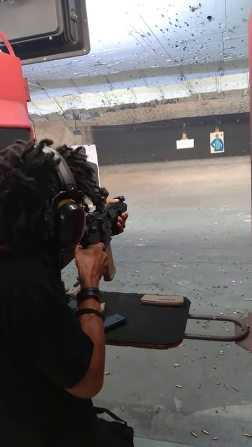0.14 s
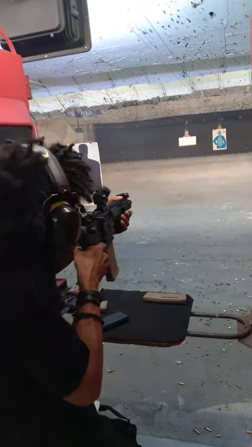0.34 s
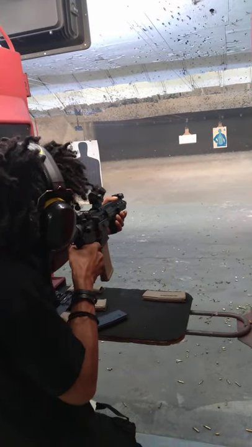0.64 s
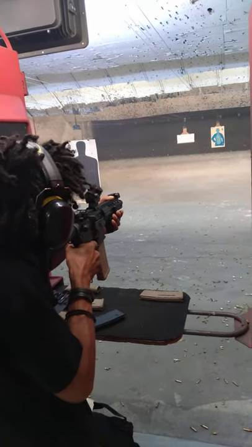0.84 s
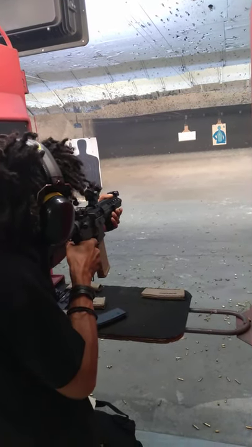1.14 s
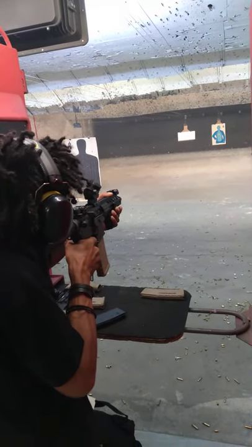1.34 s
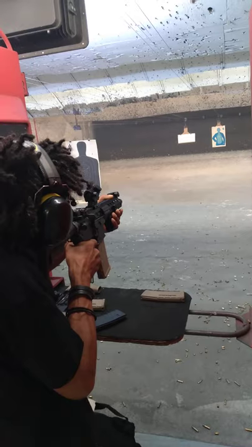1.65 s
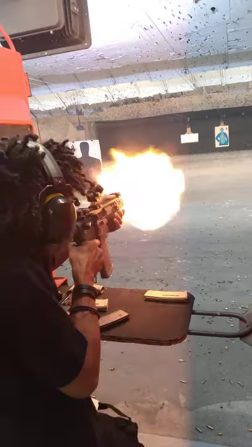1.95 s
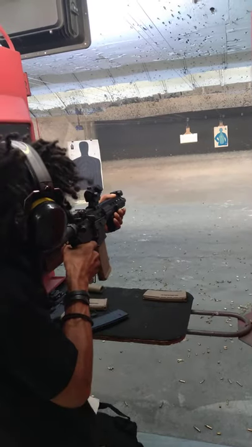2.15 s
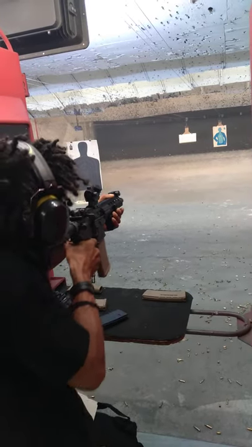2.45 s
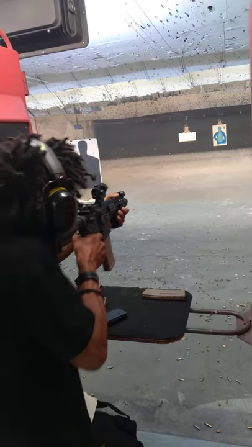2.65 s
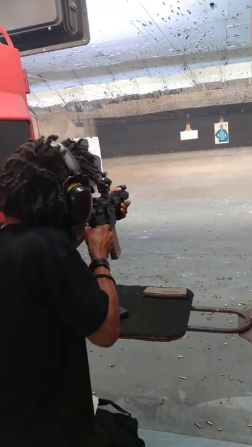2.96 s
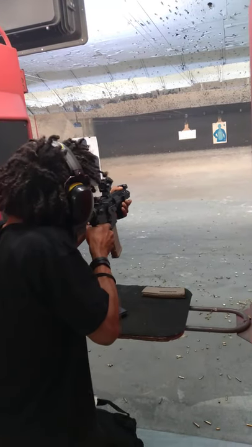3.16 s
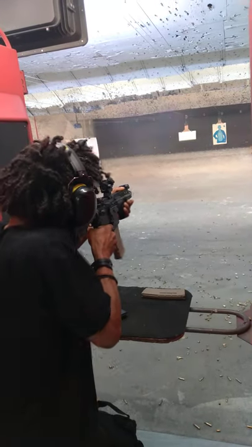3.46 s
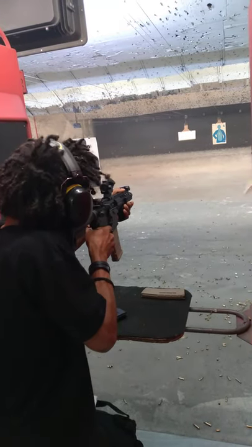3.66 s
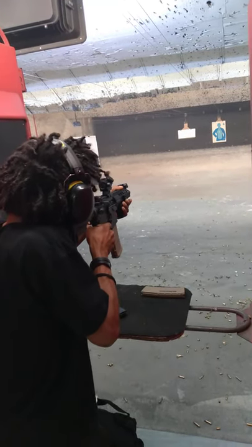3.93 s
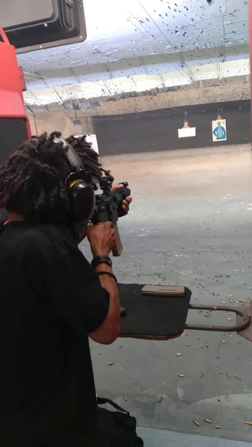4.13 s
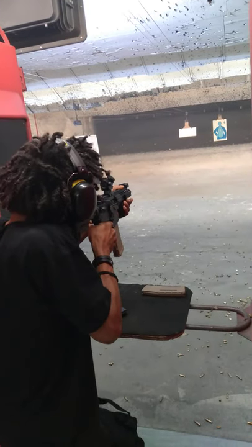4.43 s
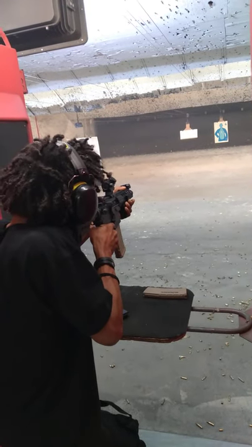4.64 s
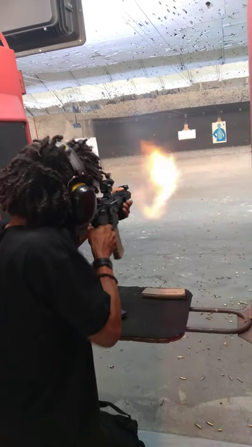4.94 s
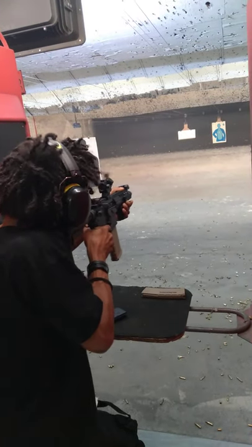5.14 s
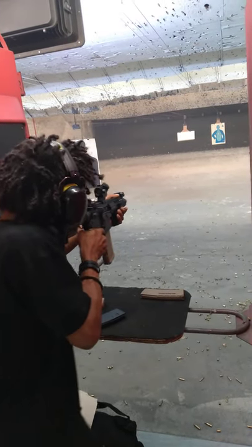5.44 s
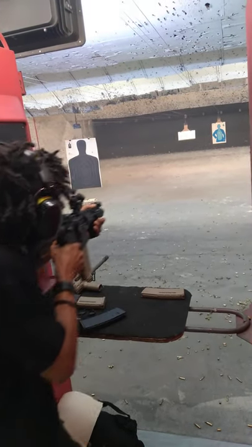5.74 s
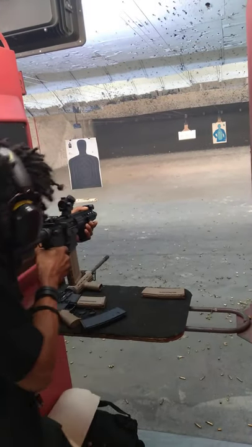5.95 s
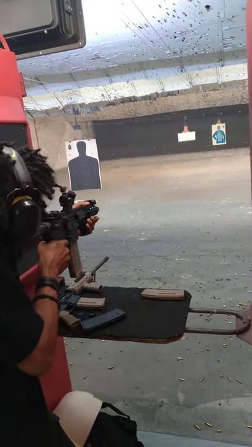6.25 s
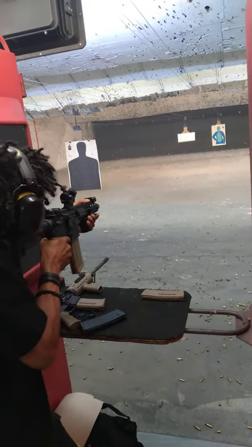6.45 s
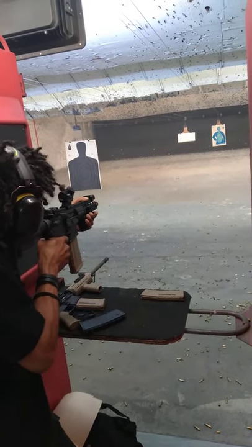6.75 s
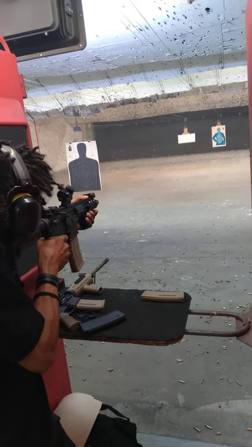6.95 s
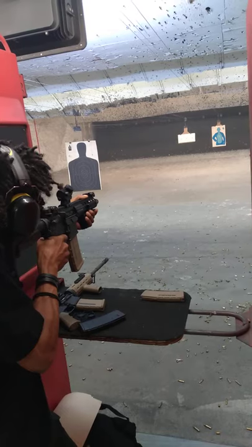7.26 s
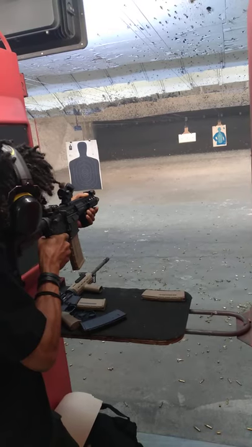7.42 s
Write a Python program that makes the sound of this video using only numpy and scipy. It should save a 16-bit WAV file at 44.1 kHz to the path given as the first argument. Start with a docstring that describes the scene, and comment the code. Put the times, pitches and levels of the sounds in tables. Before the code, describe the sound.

The sound opens on the fading roar of a gunshot in a concrete indoor range. A close rifle fires at about 0.3 seconds. A gun in another lane fires at 1.6, followed quickly by a very loud rifle shot at 2.0 and another at 3.5. The other gun answers at 4.3, the rifle fires again at 5.0, and the other gun fires last at 6.3. Each blast is a sharp crack that overloads the microphone for about half a second, its treble dying first and leaving a booming roar. A tiny hammer snap runs into the start of each rifle shot. Spent brass casings land with high, ringing clinks and short bounces, around 1.0, 2.8, 4.2 and 5.7 seconds. The final echo dies away by about 7.5 seconds, leaving a faint, steady ventilation rumble.

```python
"""A short-barrelled rifle fires in a concrete indoor range, alternating with a gun in another lane.
Each blast fills the hall with decaying noise and overloads the microphone for over half a second;
the treble dies first, leaving a roar. The rifle's hammer snaps just before each shot, and its spent
brass lands, rings and bounces on the floor. The ventilation rumbles underneath."""
import sys
import numpy as np
from scipy import signal
from scipy.io import wavfile
from scipy.ndimage import uniform_filter1d

SR = 44100
rng = np.random.default_rng(int(sys.argv[2]) if len(sys.argv) > 2 else 0)


def master_out(mix):
    """Clip the mix to full scale and print it as 16-bit PCM to the path in sys.argv[1]."""
    frames = np.transpose(np.atleast_2d(mix))
    ceiling = np.clip(frames, -1, 1)
    pcm = np.round(ceiling * 32767).astype(np.int16)
    wavfile.write(sys.argv[1], SR, pcm)


N = 334719
TIME_S = np.arange(N) / SR

# Shots of each gun. Each row: start in seconds, level in dB, then boom, bass, middle and treble in dB.
RIFLE_SHOTS = [(-0.55, 12, 4, 0.5, 2, -13), (0.273, 0.5, -3, -6, -9, 3), (2.046, 9.5, 3.5, -4, 1, -2),
               (3.5082, 9.5, 1, -1.5, 0, -1), (5.0017, 0, 3, -5, -4, 0)]
NEIGHBOUR_SHOTS = [(1.6495, -7.5, 9.5, 1, 1, 0), (4.2635, 3.5, -1, -3.5, -0.5, -4),
                   (6.278, -2, 5.5, -9, 0, -1)]
# Source spectra in the hall. Each row: frequency in Hz, third-octave level in dB.
RIFLE_SPECTRUM = [(35, -5), (65, 10.5), (130, 11.5), (250, 16), (520, 23), (750, 21), (1150, 23),
                  (1600, 20), (2500, 23), (4000, 26.5), (6500, 29), (9500, 33.5), (12000, 29),
                  (15000, 20.5)]
NEIGHBOUR_SPECTRUM = [(35, -19.5), (100, -23.5), (220, -12.5), (380, 12.5), (750, 22), (1200, 26),
                      (1750, 16), (2300, 22), (4300, 23.5), (6500, 28.5), (9500, 32), (12000, 20.5),
                      (15000, 7)]
VENT_SPECTRUM = [(35, -59), (70, -53.5), (130, -51), (220, -58.5), (400, -56), (1000, -53), (2500, -66),
                 (5000, -69.5), (9000, -62), (15000, -80)]
# Hall decay. Each row: frequency in Hz, T60 in seconds.
HALL_T60 = [(60, 0.93), (170, 0.97), (350, 0.95), (700, 0.88), (1400, 0.84), (2700, 0.76), (5400, 0.69),
            (9000, 0.59), (15000, 0.45)]
# Late echo from down the range. Each row: frequency in Hz, gain in dB.
FAR_ECHO = [(100, -22), (190, -19.5), (400, -24), (900, -29.5), (1800, -30), (4300, -35), (6400, -31),
            (9000, -35.5), (13000, -39.5)]
# Diffuse field. Each row: frequency in Hz, left-right correlation.
CORRELATION = [(50, 0.97), (130, 0.99), (290, 0.92), (640, 0.47), (1200, -0.17), (2500, -0.018),
               (8000, 0.106)]
# Booth standing waves and microphone port colour. Each row: frequency in Hz, width in Hz, gain in dB.
BOOTH_PEAKS = [(229.6, 32, 4), (333, 14, 5), (402.5, 36, 4.5), (835, 70, 4), (1090, 110, 0.5),
               (2040, 220, 2.5), (4650, 1000, -1.5), (5380, 590, 0.5), (6770, 550, 1.5)]
# Colour after the overload. Each row: frequency in Hz, width in Hz, gain in dB.
MIC_PEAKS = [(1000, 1220, 2.5), (4940, 4900, -2.5), (9720, 2700, 2), (13400, 6600, -3)]
# Microphone port mismatch. Each row: frequency in Hz, width in Hz, left minus right in dB.
PORT_PEAKS = [(80, 200, -4), (680, 310, -3), (1540, 650, 3), (2700, 900, -2), (6440, 1500, 4)]
# A case's knock and two bending rings. Each row: frequency in Hz, width in Hz.
KNOCK_MODES = [(6900, 520), (9400, 3300)]
LOW_RING_MODES = [(11400, 110)]
HIGH_RING_MODES = [(15090, 80), (15430, 120)]
# Ejected cases. Each row: landing in seconds, then in dB clack, ring, high over low ring, leftward pan,
# rebound clack, rebound ring, loss per bounce.
CASE_LANDINGS = [(0.084, -19, -34.5, -3, 4.5, -42.5, -40.5, 11.5), (0.977, -15.5, -18.5, 3, 0, -53, -40, 0),
                 (1.462, -45.5, -54, -2, 11, -58, -67, 4.5), (2.822, -28.5, -44, 4, 2, -28.5, -32.5, 11.5),
                 (4.22, -14.5, -14, -13, -1.5, -44, -17, 10.5), (5.7318, -25.5, -30, 2, 5, -48, -45, 2)]
# Hops of those cases. Each row: first hop in seconds, share of hop time kept per bounce.
CASE_HOPS = [(.33, .5), (.3, .56), (.089, .57), (.369, .5), (.42, .5), (.328, .48)]


def from_db(db):
    """Decibels to gain."""
    return 10 ** (np.asarray(db) / 20)


def unit_rms(x):
    """Scale to unit power."""
    return x / np.sqrt(np.mean(x ** 2) + 1e-20)


def at_hz(table, hz):
    """Read a table on a log-frequency axis."""
    freqs_hz, values = np.transpose(table)
    return np.interp(np.log(hz), np.log(freqs_hz), values)


def band(x, low_hz, high_hz, order=2):
    """Band-pass at unit power."""
    sos = signal.butter(order, [low_hz, min(high_hz, SR / 2 - 500)], "band", fs=SR, output="sos")
    return unit_rms(signal.sosfilt(sos, x))


def peaks(x, table):
    """Resonant boosts and cuts in series."""
    for hz, width_hz, db in table:
        x = x + (from_db(db) - 1) * signal.lfilter(*signal.iirpeak(hz, hz / width_hz, fs=SR), x)
    return x


def bell(hz, centre_hz, width_hz):
    """Resonance curve of height 1."""
    return 1 / (1 + ((hz - centre_hz) / width_hz) ** 2)


def low_shelf(hz, corner_hz, power=2):
    """Weight falling from 1 to 0 around the corner."""
    return 1 / (1 + (hz / corner_hz) ** power)


def decay(age_s, t60_s):
    """Exponential decay with a 0.5 ms attack."""
    return np.clip(age_s * 2000, 0, 1) * from_db(-60 * np.maximum(age_s, 0) / t60_s)


def ventilation_power(hz):
    """Steady ventilation rumble in one band."""
    return from_db(at_hz(VENT_SPECTRUM, hz)) ** 2


def bounces(count=3, settling_db=10.0, first_knock_db=10, rebound_knock_db=0, brighter_db=5):
    """A case lands hard, then rebounds brighter in ever shorter hops, fading faster as it settles."""
    for case, (hop_s, kept) in zip(CASE_LANDINGS, CASE_HOPS):
        start_s, clack_db, ring_db, high_db, pan_db, rebound_clack_db, rebound_ring_db, loss_db = case
        yield start_s, clack_db, first_knock_db, ring_db, high_db, pan_db
        for k in range(count):
            start_s += hop_s * kept ** k
            lost_db = k * loss_db + k * (k - 1) * settling_db
            yield (start_s, rebound_clack_db - lost_db, rebound_knock_db,
                   rebound_ring_db - lost_db, high_db + brighter_db, pan_db)


def brass(knock_t60_s=0.013, room_t60_s=0.25, ring_t60_s=0.21, spin_db=-14, spin_t60_s=0.36):
    """Each contact knocks with a short echo; the case rings, and rings on faintly as it spins."""
    white = rng.standard_normal((2, N))
    room = band(white, 5300, 12500, order=4)
    knock, low, high = (
        unit_rms(sum(band(white, hz - width_hz / 2, hz + width_hz / 2) for hz, width_hz in modes))
        for modes in (KNOCK_MODES, LOW_RING_MODES, HIGH_RING_MODES))
    out = np.zeros((2, N))
    for start_s, clack_db, knock_db, ring_db, high_db, pan_db in bounces():
        span = slice(int(start_s * SR), int(start_s * SR) + SR // 2)
        age_s = TIME_S[span] - start_s
        impact = from_db(knock_db) * knock[:, span] * decay(age_s, knock_t60_s)
        clack = from_db(clack_db) * (impact + room[:, span] * decay(age_s, room_t60_s))
        bending = low[:, span] + from_db(high_db) * high[:, span]
        ring = from_db(ring_db) * bending * decay(age_s, ring_t60_s)
        spin = from_db(ring_db + spin_db) * low[:, span] * decay(age_s, spin_t60_s)
        out[:, span] += (clack + ring + spin) * from_db([[pan_db / 2], [-pan_db / 2]])
    return out


def hammer(level_db=-17, lead_s=0.0082, t60_s=0.08):
    """The hammer snaps on the firing pin just before each rifle shot."""
    snap = band(rng.standard_normal((2, N)), 5500, 12000)
    return from_db(level_db) * snap * sum(decay(TIME_S - shot[0] + lead_s, t60_s) for shot in RIFLE_SHOTS)


def clumps(time_s):
    """Reflections arrive in clumps of about 25 ms; unit RMS."""
    return unit_rms(uniform_filter1d(rng.standard_normal(len(time_s)), size=55))


def surges_db(time_s, lift_db=3.5, width_s=0.005, count=30):
    """Wall reflections coincide now and then, briefly lifting the roar."""
    offsets, sizes = rng.random((count, 2)).T
    centres_s = (np.arange(count) + offsets) * time_s[-1] / count
    return sum(lift_db * (0.5 + size) * np.exp(-((time_s - centre_s) / width_s) ** 2)
               for centre_s, size in zip(centres_s, sizes))


def blast_power(shots, spectrum, hz, time_s, far_db, far_stretch=1.794,
                build_s=0.087, early_share=0.19, crack_db=6.5, crack_t60_s=0.3):
    """One gun in one band: bright muzzle crack, hall decay and a faint, longer echo from down range."""
    boom, bass = low_shelf(hz, 130, power=4), low_shelf(hz, 400)
    middle, treble = bell(hz, 1360, 295), 1 - low_shelf(hz, 3500)
    delayed_share = (1 - early_share) * low_shelf(hz, 900)   # lows build up slowly
    t60_s = at_hz(HALL_T60, hz)
    power = 0
    for start_s, level_db, boom_db, bass_db, middle_db, treble_db in shots:
        age_s = time_s - start_s
        tone_db = boom * boom_db + bass * bass_db + middle * middle_db + treble * treble_db
        build_up = 1 - delayed_share * np.exp(-np.maximum(age_s, 0) / build_s)
        gain = from_db(at_hz(spectrum, hz) + tone_db) * build_up
        crack = from_db(level_db + crack_db) * bell(hz, 9980, 1400) * decay(age_s, crack_t60_s)
        roar = from_db(level_db) * decay(age_s, t60_s)
        echo = from_db(far_db + at_hz(FAR_ECHO, hz)) * decay(age_s, t60_s * far_stretch)
        power += gain ** 2 * (crack ** 2 + roar ** 2 + echo ** 2)
    return power


def gunfire_in_hall(flutter_db=1.56, roll_db=3.0, roll_hz=1300):
    """Diffuse field of both guns over the ventilation, in third octaves; the lows roll most."""
    time_s = TIME_S[::20]
    edges_hz = 31 * 2 ** (np.arange(29) / 3)
    white = rng.standard_normal((2, 2, N))
    all_bands_db = flutter_db * clumps(time_s)
    surge_db = surges_db(time_s)
    out = 0
    for k, (low_hz, high_hz) in enumerate(zip(edges_hz, edges_hz[1:])):
        hz = np.sqrt(low_hz * high_hz)
        mid, side = band(white[k % 2], low_hz, high_hz)   # adjacent bands are independent
        correlation = at_hz(CORRELATION, hz)
        field = np.sqrt((1 + correlation) / 2) * mid + np.sqrt((1 - correlation) / 2) * side * [[1], [-1]]
        neighbour = blast_power(NEIGHBOUR_SHOTS, NEIGHBOUR_SPECTRUM, hz, time_s, far_db=-12)
        rifle = blast_power(RIFLE_SHOTS, RIFLE_SPECTRUM, hz, time_s, far_db=-1)
        lows_db = (surge_db + roll_db * clumps(time_s)) * low_shelf(hz, roll_hz)
        power = ventilation_power(hz) + (neighbour + rifle) * from_db(all_bands_db + lows_db) ** 2
        out += field * np.interp(TIME_S, time_s, np.sqrt(power))
    return out


def scene(left_db=3.0):
    """Sound at the firing booth; the hall is louder on the left."""
    hall = peaks(gunfire_in_hall(), BOOTH_PEAKS) * from_db([[left_db / 2], [-left_db / 2]])
    return hall + hammer() + brass()


def mic_ports(x):
    """The two ports colour the sound in opposite directions."""
    return np.array([peaks(channel, [(hz, width_hz, sign * db / 2) for hz, width_hz, db in PORT_PEAKS])
                     for channel, sign in zip(x, (1, -1))])


def treble_gate(x, split_hz, threshold_db, knee_db, depth_db):
    """Noise suppression: treble below the threshold is turned down."""
    treble = signal.sosfiltfilt(signal.butter(4, split_hz, "high", fs=SR, output="sos"), x)
    power = uniform_filter1d(np.mean(treble ** 2, axis=0), size=900)
    level_db = 10 * np.log10(np.abs(power) + 1e-12)
    closed = 0.5 - 0.5 * np.tanh((level_db - threshold_db) / (2 * knee_db + 1e-12))
    return x + treble * (from_db(depth_db * closed) - 1)


def record(dry, ceiling=0.44, bass_cut_hz=190, top_cut_hz=15900):
    """The microphone saturates; its bass cut tilts the flat tops. Colour, gates and low-pass follow."""
    clipped = dry / (1 + (dry / ceiling) ** 4) ** (1 / 4)
    tilted = signal.lfilter(*signal.butter(1, bass_cut_hz, "high", fs=SR), clipped)
    coloured = mic_ports(peaks(tilted, MIC_PEAKS))
    gated = treble_gate(coloured, split_hz=3600, threshold_db=-36, knee_db=1.5, depth_db=-7)
    gated = treble_gate(gated, split_hz=13000, threshold_db=-36.5, knee_db=0, depth_db=-5)
    return signal.sosfilt(signal.ellip(10, 0.2, 70, top_cut_hz, fs=SR, output="sos"), gated)


dry = scene()
out = record(dry)
master_out(out)
```